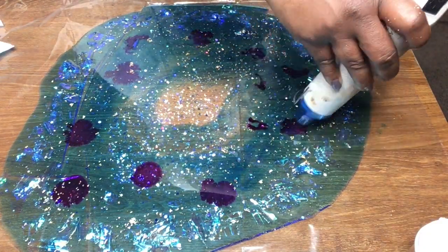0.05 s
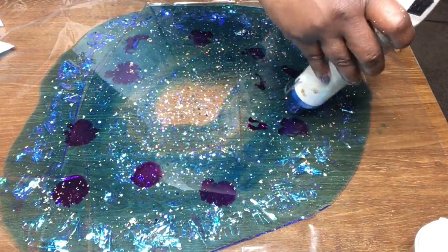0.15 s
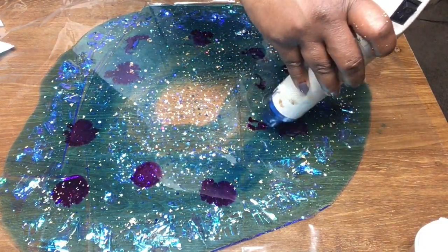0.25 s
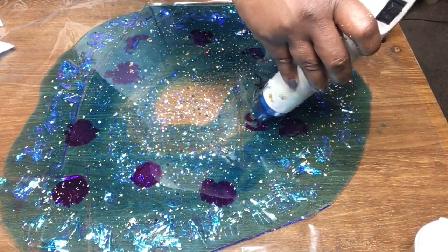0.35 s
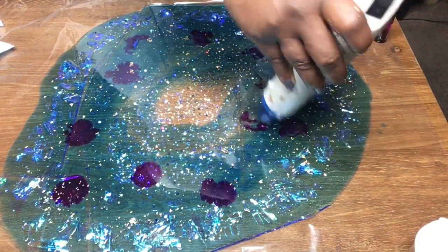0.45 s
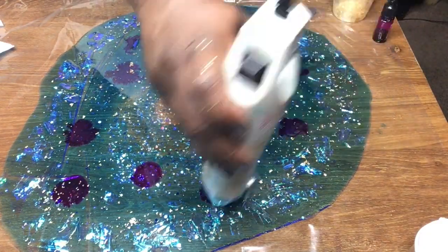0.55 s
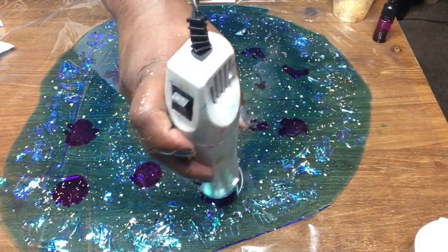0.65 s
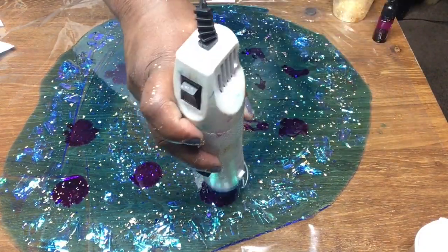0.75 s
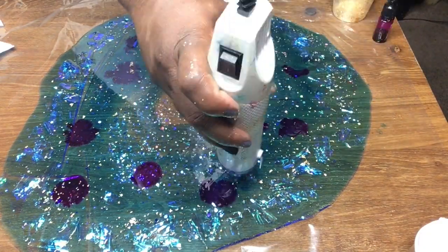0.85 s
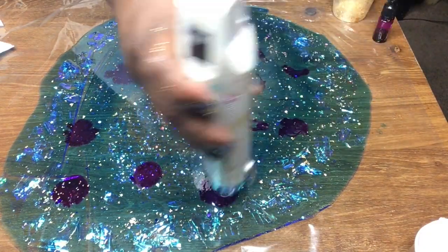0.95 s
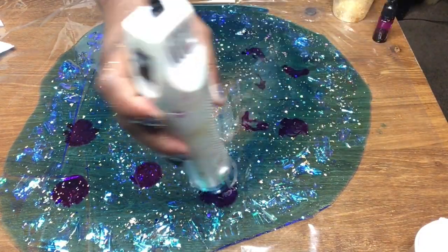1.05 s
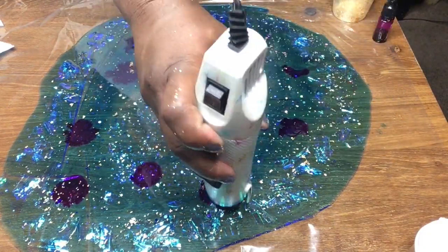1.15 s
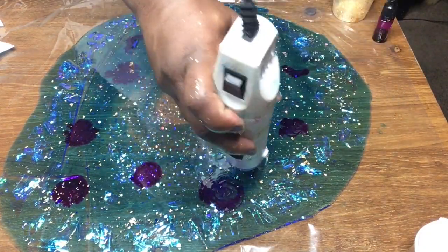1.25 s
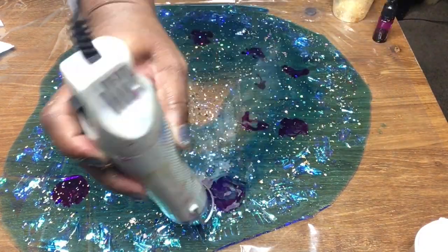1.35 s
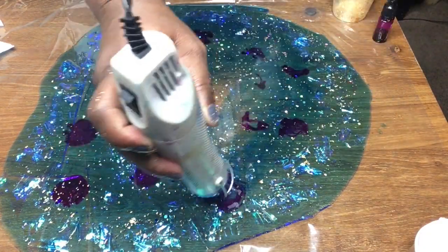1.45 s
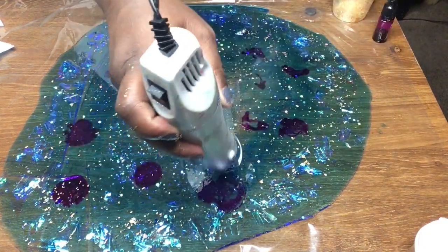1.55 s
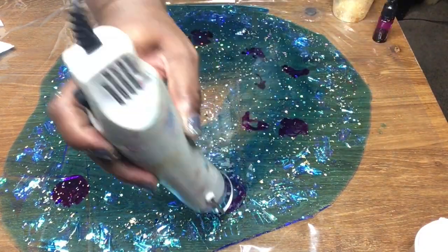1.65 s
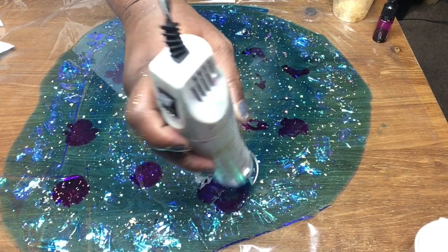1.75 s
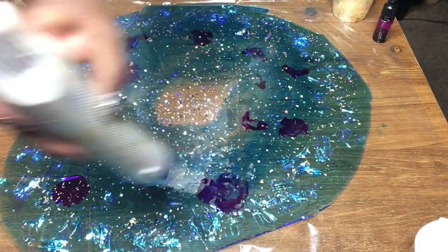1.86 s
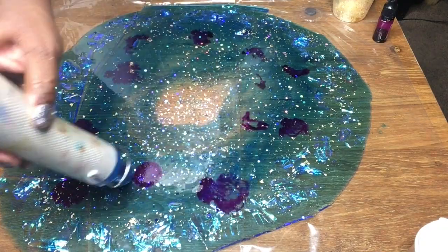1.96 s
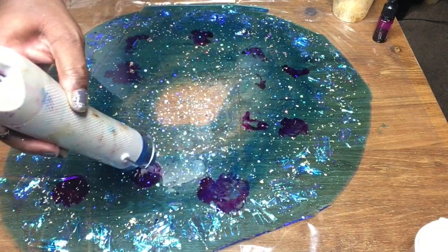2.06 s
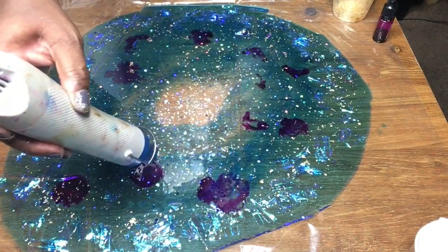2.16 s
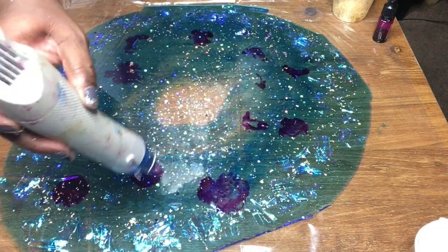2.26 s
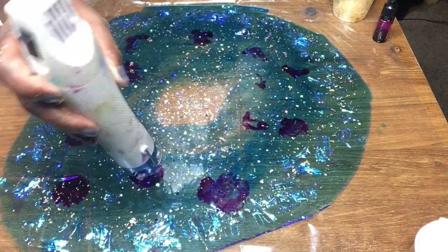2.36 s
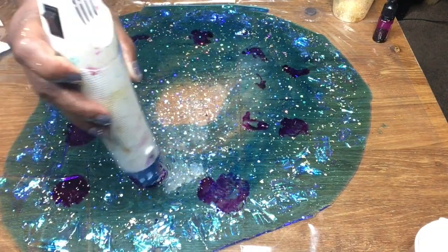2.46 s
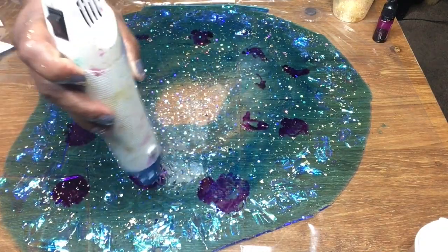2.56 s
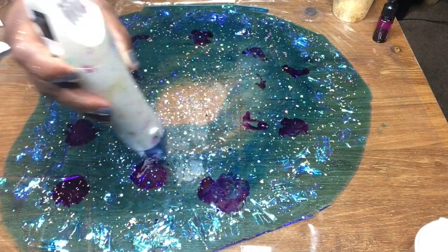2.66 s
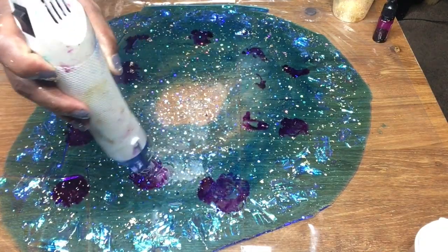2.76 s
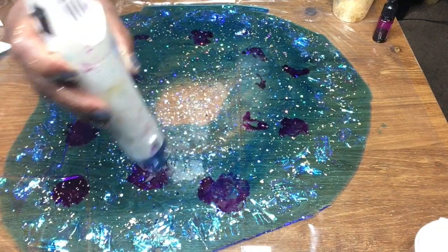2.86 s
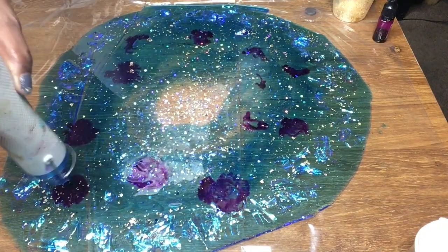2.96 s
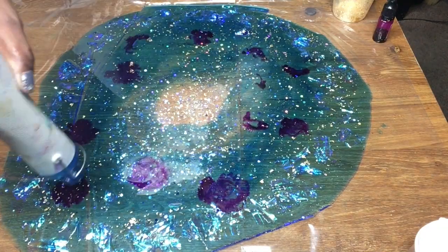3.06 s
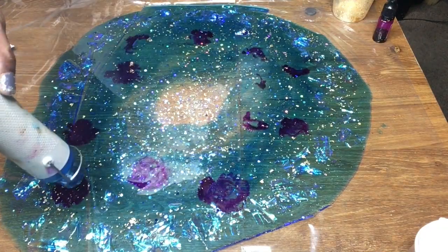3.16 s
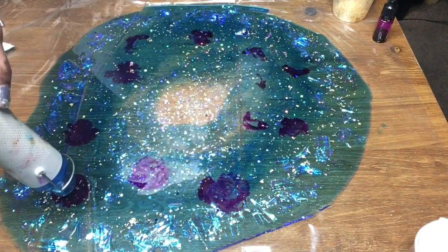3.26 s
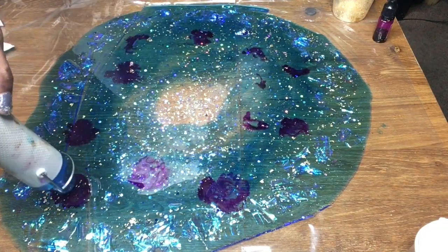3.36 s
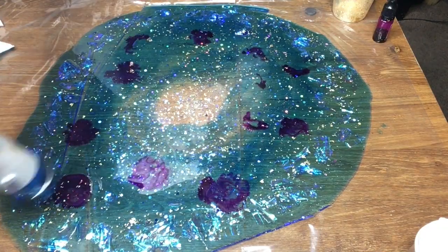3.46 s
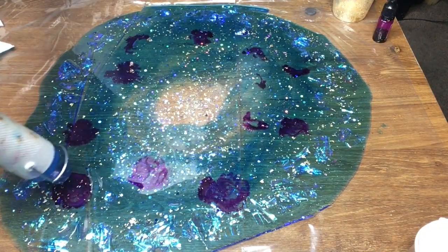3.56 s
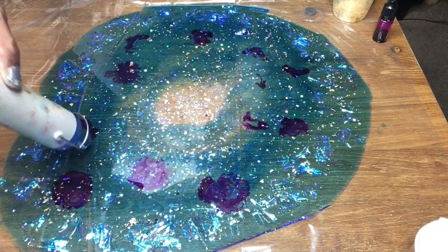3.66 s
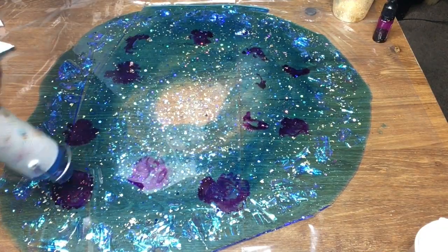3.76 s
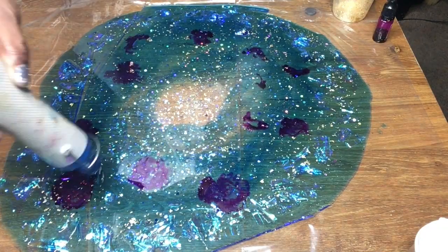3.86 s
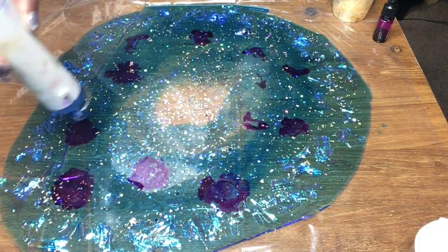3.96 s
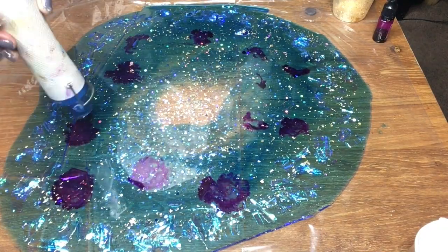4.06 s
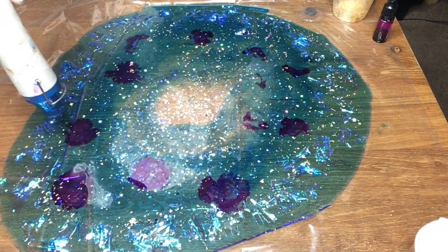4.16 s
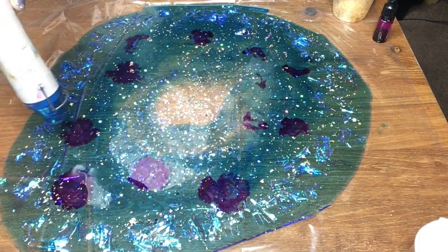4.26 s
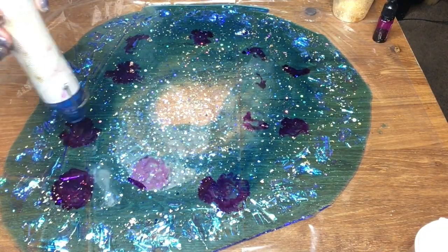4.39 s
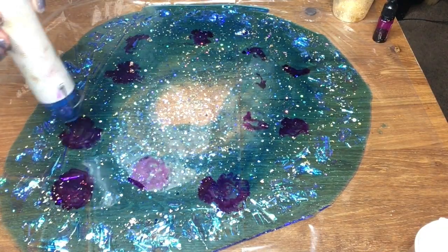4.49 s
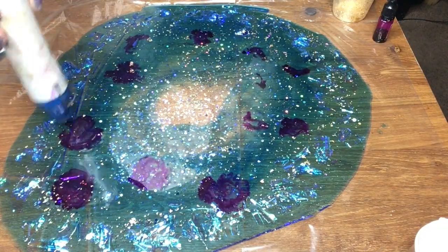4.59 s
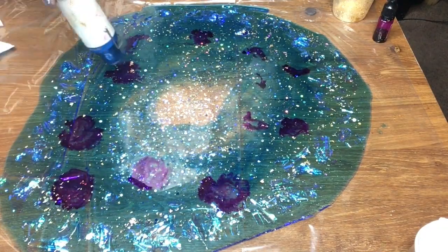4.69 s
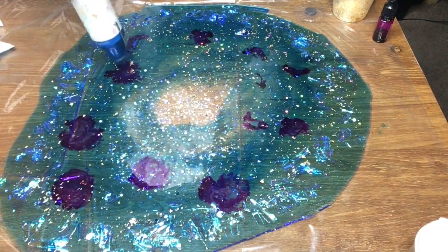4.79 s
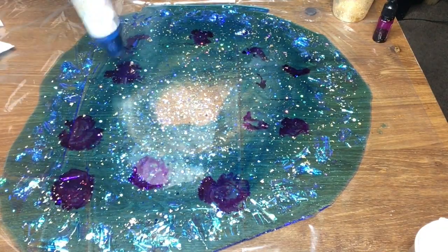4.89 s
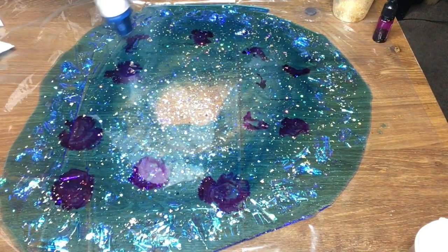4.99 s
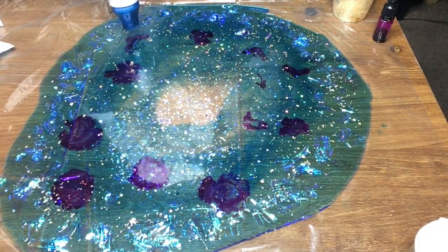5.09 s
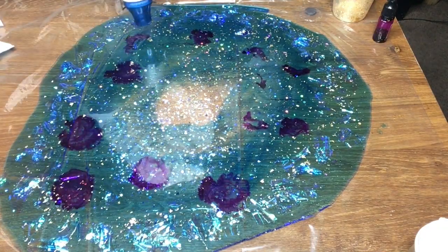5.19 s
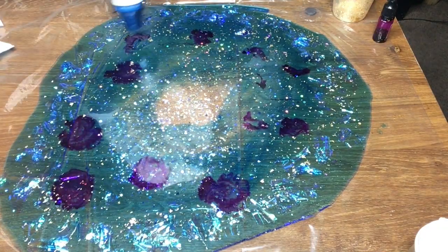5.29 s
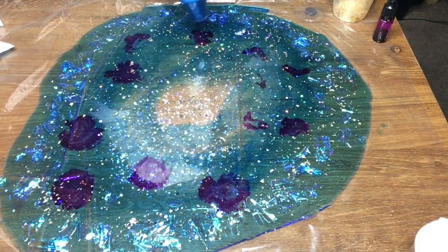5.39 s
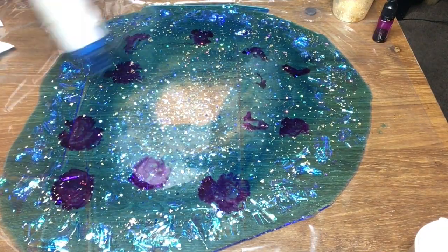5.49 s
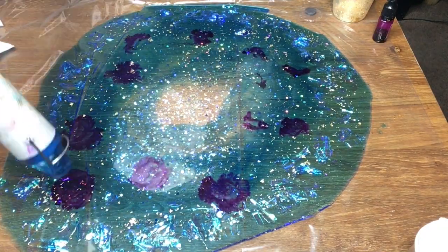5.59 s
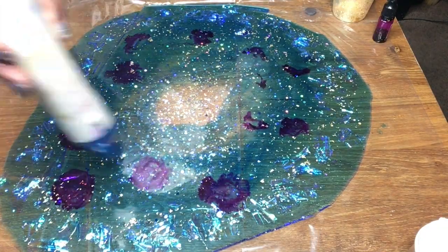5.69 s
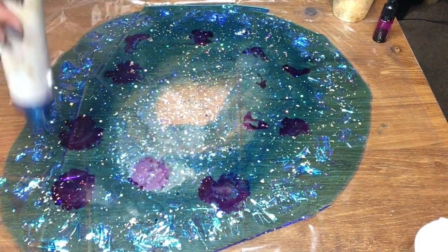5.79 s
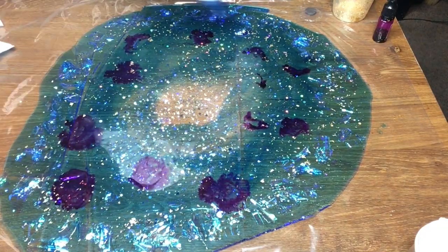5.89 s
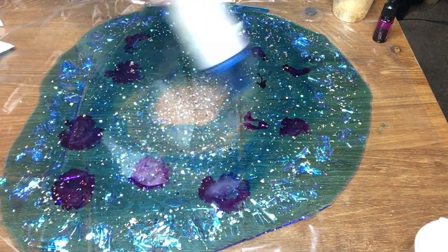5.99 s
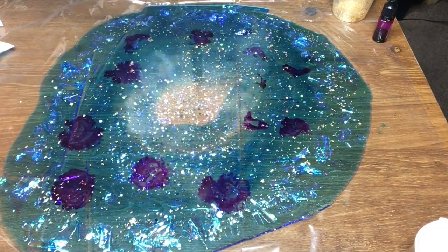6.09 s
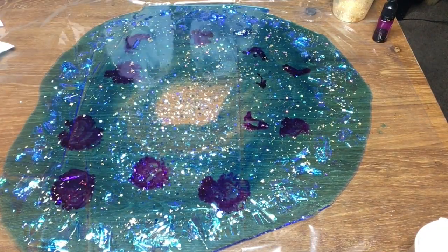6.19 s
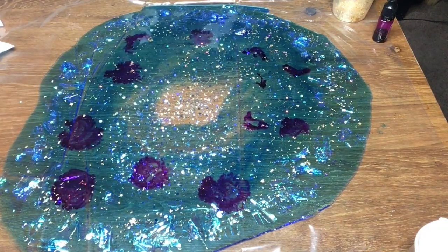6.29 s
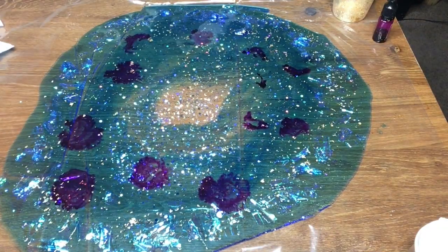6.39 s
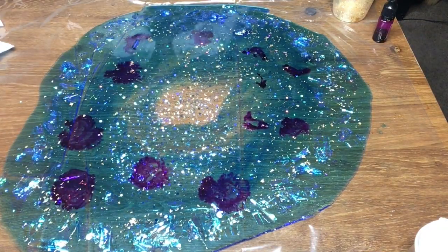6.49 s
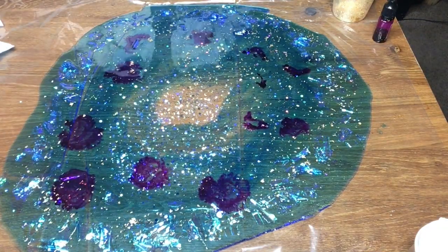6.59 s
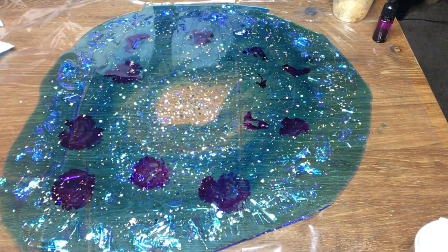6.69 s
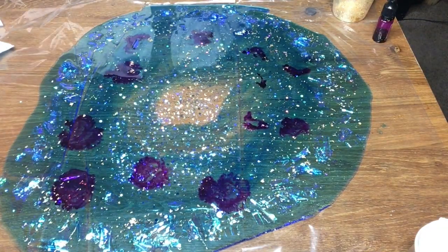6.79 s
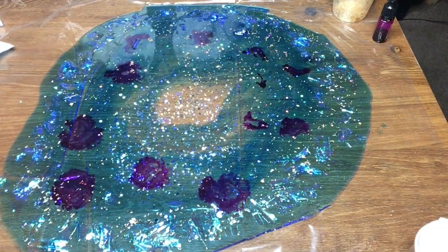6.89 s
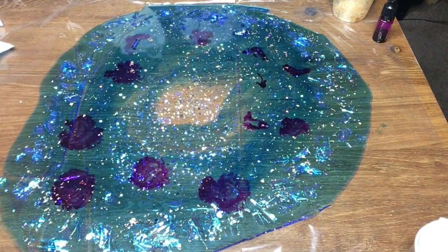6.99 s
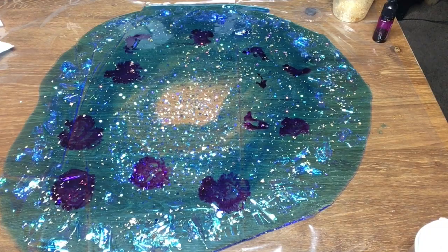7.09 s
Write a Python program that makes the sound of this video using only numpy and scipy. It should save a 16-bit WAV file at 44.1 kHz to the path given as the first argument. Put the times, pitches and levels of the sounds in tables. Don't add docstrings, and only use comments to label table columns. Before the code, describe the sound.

In a quiet craft room, a handheld hot-air tool whines and blows steadily, heard very near on a phone microphone with thin bass. Air noise swells and thins, with a short fluttering treble reflection from the table. A click cuts the motor, which drops in pitch and stops within a tenth of a second. Small taps, two hollow plastic knocks and a brief scrape follow over soft room hush and a distant pulsing hum.

```python
import sys
import numpy as np
from scipy import signal
from scipy.fft import rfft, irfft, next_fast_len
from scipy.io import wavfile
from scipy.ndimage import uniform_filter1d, map_coordinates

SR = 44100
rng = np.random.default_rng(int(sys.argv[2]) if len(sys.argv) > 2 else 0)


def makeup_ratio(level_db):
    decades = np.asarray(level_db, float) / 20
    return 10 ** decades


def inscribe(sig):
    pcm = np.round(np.clip(np.atleast_2d(sig).T, -1, 1) * 32767)
    wavfile.write(sys.argv[1], SR, pcm.astype(np.int16))


N = 314861

# (frequency [Hz], density [dB per Hz])
ROOM_SPECTRUM = [(60, -32), (120, -19), (200, -22.5), (300, -11.5), (500, -8.5), (750, -10.5), (1000, -5),
                 (1300, -10), (1700, -19.5), (3300, -24.5), (6000, -30), (11000, -32), (15000, -35),
                 (15500, -45)]
# (time [s], level [dB])
HUSH_GAIN = [(6.5, 1), (6.7, 0), (6.85, -2.5), (6.98, -2), (7.02, -1)]
# (frequency [Hz], width [Hz], level [dB])
APPLIANCE_HUM = [(384, 10, -83), (468.3, 4, -83), (1270, 14, -78), (3004, 20, -90)]
# (time [s], frequency [Hz])
THROB_PITCH = [(0, 1150), (5.1, 1147), (5.4, 1141), (6.9, 1137), (7.0, 1145)]
# (middle [s], length [s], level [dB])
THROB_SWELLS = [(6.495, 0.07, -66), (6.628, .1, -64.5), (6.718, .07, -64), (6.862, 0.13, -65),
                (7.055, 0.19, -64.5)]
# (time [s], centre [Hz])
SIDE_BANDS = [(.1, 13200), (.89, 5800), (1.35, 5800), (1.49, 11200), (1.82, 6700), (1.84, 7700),
              (1.84, 12500), (1.91, 6300), (2.03, 9800), (2.05, 5800), (2.05, 14900), (2.12, 11800),
              (2.3, 11200), (2.33, 4800), (3.07, 11800), (3.14, 4800), (3.51, 5300), (3.51, 11200),
              (3.79, 13200), (5.07, 11200), (5.07, 13200), (5.67, 14600), (6.13, 11200)]

# (time [s], crack [dB], hollow knock [dB], shell [dB], shell pitch [Hz])
TAPS = [(6.411, -32, -75, -51, 1510), (6.5255, -44, -66, -60, 5800), (6.5516, -63, -70, -73, 1520),
        (6.6375, -58, -68, -63, 1610), (6.6546, -56, -71, -64, 1510), (6.674, -60, -68, -55, 2000),
        (6.678, -61, -70, -59, 1500), (6.6954, -66, -68, -62, 1580), (6.7332, -47, -41, -45, 1580),
        (6.7654, -59, -71, -71, 1520), (6.774, -58, -76, -69, 2750), (6.7893, -59, -70, -63, 2800),
        (6.801, -42, -46.5, -56, 2700), (6.8284, -57, -66, -69, 2560), (6.899, -78, -66, -76, 1540),
        (6.997, -56, -70, -64, 1500)]
# (time [s], frequency [Hz], level [dB])
THUDS = [(6.285, 674, -48), (6.287, 1230, -44), (6.322, 670, -46), (6.324, 990, -49), (6.49, 230, -58),
         (6.488, 310, -58), (6.492, 185, -56), (6.338, 910, -53), (6.83, 160, -58)]
# (time [s], frequency [Hz], level [dB], t60 [s])
TICKS = [(6.5255, 5930, -46, .009), (6.5258, 9500, -50, .005), (6.5515, 6000, -61, .005),
         (6.552, 11500, -64, .004), (6.565, 1250, -57, .008), (6.6745, 2100, -43, .004),
         (6.695, 2100, -49, .003), (6.601, 11000, -72, .08), (6.9975, 3900, -63, .012),
         (6.700, 1500, -57, .006), (6.7337, 1900, -49, .004), (6.7337, 9000, -56, .004),
         (6.774, 11500, -57, .003), (6.788, 9000, -63, .003), (6.8016, 10500, -42, .005),
         (6.8015, 2390, -44, .008), (6.804, 9000, -52, .008), (6.862, 1500, -58, .002),
         (6.9003, 1100, -48, .004), (6.906, 1300, -56, .006), (6.968, 1000, -57, .004),
         (6.998, 8500, -57, .005), (7.004, 1400, -55, .005), (7.038, 11000, -69, .006),
         (7.065, 12000, -68, .008)]
# (frequency [Hz], level [dB], t60 [s])
CLACKS = [
    ([6.734, 6.7375], -43.5, [(1500, -4, .02), (1850, -1, .03), (2250, -6, .015), (3000, -6, .012), (4750, -6, .012), (5300, -8, .015), (5800, -14, .03)]),
    ([6.8012, 6.8045], -46.5, [(2050, -5, .014), (2300, -3, .02), (2530, -1, .03), (2800, -4, .035), (2990, -5, 0.042), (3230, -3, .045), (3400, -9, .03)]),
]
# (frequency [Hz], level [dB], t60 [s])
HOLLOW_MODES = [(644, -1, 0.078), (860, -6, 0.031), (1244, -17, 0.037)]
# (middle [s], length [s], level [dB])
RUSTLES = [(6.65, .05, -73), (6.76, .08, -68), (6.818, 0.065, -63.5), (7.012, .03, -75), (7.05, .12, -79)]
# (frequency [Hz], density [dB per Hz])
RUSTLE_SPECTRUM = [(1500, -20), (2600, 2), (3500, -4), (6000, -6), (11000, -7), (15700, -10)]

# (frequency [Hz], density [dB per Hz])
ROAR_SPECTRUM = [(150, -37), (300, -32), (760, -21.5), (850, -10), (1050, -15.5), (1500, -8), (2050, -6),
                 (2600, -4.5), (3100, -5.5), (3600, -8), (3900, -19), (4800, -41)]
HISS_SPECTRUM = [(3500, -47), (4600, -17), (4950, -8), (5200, 0), (5800, -1.5), (7200, -9), (8400, -4.5),
                 (9400, -9), (11000, -9), (13000, -10), (14500, -9.5), (15800, -10)]
INTAKE_SPECTRUM = [(3000, -27), (3600, -0.5), (4200, 0.5), (4900, -2.5), (5500, -34)]
# (time [s], centre [Hz], level [dB])
BARREL_DRIFT = [(0.0, 2550, 1), (0.49, 2530, 0), (0.8, 2417, -3), (1.85, 2424, -1), (2.21, 2596, 0.5),
                (2.71, 2600, 1.5), (3.3, 2543, 2), (3.9, 2607, 0.5), (4.5, 2680, 1), (4.69, 2640, -2),
                (4.83, 2455, -0.5), (5.43, 2424, 3.5), (5.87, 2665, 1.5), (5.98, 2356, -3), (6.03, 2626, 2),
                (6.3, 2500, -0.5), (6.45, 2470, 4), (6.52, 2450, 4), (6.56, 2450, -9)]
# (offset from centre [Hz], density [dB per Hz])
BARREL_SHAPE = [(5, -3), (120, -1.5), (260, -6.5), (500, -29)]
# (time [s], level [dB], top treble [dB])
NOZZLE_AIM = [(0, -1, 2.5), (.5, 0.5, -1.5), (.62, 1, 2.5), (1.35, 1.5, 1.5), (1.45, 1.5, 0),
              (1.92, 0.5, -0.5), (2.0, 1, -0.5), (3.3, 0, -3), (3.7, 0.5, -4), (4.6, -0.5, -2),
              (5.15, -6, 5.5), (5.5, -6, 3.5), (5.95, -2, 1.5), (6.3, -5.5, 1), (6.41, -4, -2)]
# (time [s], level [dB])
TOP_HISS = [(0, 1.5), (2, 1), (3.1, 2), (3.5, 3), (4.0, 2), (4.2, -5), (5.0, -5), (5.3, -4), (5.8, -3),
            (6.4, 0)]
# (middle [s], length [s], level [dB])
PASSES = [(5.632, 0.22, 3), (5.768, 0.27, 2.5), (5.93, .12, -1.5), (3.9, 0.34, 0.5), (6.102, 0.26, 1.5)]
# (time [s], spacing of comb peaks [Hz], echo share [0-1])
TABLE_ECHO = [(0, 4150, .25), (.15, 4250, .35), (.55, 4250, .35), (.66, 3600, .42), (1.95, 3600, .4),
              (2.05, 3750, .12), (3.15, 3880, .22), (3.55, 4400, .25), (4.0, 4500, .25), (4.3, 4800, .45),
              (4.7, 5000, .45), (4.97, 5300, .5), (5.11, 6350, .55), (5.33, 6450, .45), (5.46, 5600, .32),
              (5.62, 4300, .2), (6.05, 4200, .2), (6.25, 3700, .15), (6.5, 3700, .15)]
# (delay [ms], level [dB])
WALL_ECHOES = [(1.7, -26), (2.3, -19), (2.9, -20), (3.6, -23.5), (4.1, -18), (4.8, -22.5), (6.6, -26),
               (9.3, -26), (13.1, -23.5), (17.9, -26.5), (24.3, -23)]

# (time [s], blade rate [Hz])
FAN_DRIFT = [(0, 1690.5), (.58, 1695), (1.27, 1691), (1.5, 1686), (2.3, 1694), (3.07, 1685), (3.61, 1694),
             (3.74, 1690), (4.45, 1690), (4.62, 1684.5), (4.81, 1694), (4.98, 1690), (5.5, 1693),
             (5.78, 1684), (6.07, 1689.5), (6.24, 1684), (6.41, 1697)]
# (from [s], until [s], slowing [s])
FAN_SURGES = [
    (-1, 1.27, .15),
    (3.61, 4.22, .26),
    (4.81, 5.2, .17),
]
# (time [s], share of full speed [0-1], tone gain [dB])
BRAKING = [(6.418, 1, -2), (6.428, .91, 1), (6.443, .79, -7), (6.449, .73, -18), (6.48, .45, -20),
           (6.5, .15, -24), (6.51, .05, -70)]
# (from [s], blade tone [dB], 3rd overtone [dB], 5th [dB], upper overtones [dB])
HAND_POSES = [(0, -42, -51.5, -50.5, -54.5), (.66, -57.5, -57.5, -48.5, -52), (.86, -52, -58, -50, -52.5),
              (1.13, -52.5, -59, -49, -52), (1.385, -51.5, -59, -43.5, -60), (1.69, -45.5, -57, -43.5, -57),
              (1.78, -49.5, -57, -44.5, -55), (1.9, -46, -63, -44.5, -68), (2.39, -53.5, -59.5, -43.5, -63),
              (3.2, -48.5, -59, -43, -78), (3.675, -42, -56, -42, -75), (4.03, -44, -46.5, -46.5, -70),
              (4.17, -43.5, -46.5, -58, -65), (4.35, -51.5, -48.5, -59, -62), (4.52, -59, -52, -50, -62),
              (4.72, -48, -63, -50.5, -58), (5.0, -42.5, -65, -54.5, -60), (5.56, -50, -54.5, -53, -61),
              (5.75, -55, -59, -44, -66), (5.88, -43, -56, -42.5, -58), (5.97, -43.5, -48, -50.5, -55),
              (6.08, -51, -56, -39.5, -68), (6.17, -45, -61, -50.5, -55.5), (6.32, -47.5, -58.5, -54, -63)]
# (time [s], depth [dB])
FLUTTER = [(0, .7), (5.4, .8), (5.6, 3.5), (6.4, 3.5)]
# (multiple of blade rate, middle [s], length [s], level
# [dB])
PARTIAL_SWELLS = [(1, .96, .2, 2.5), (1, 1.3, 0.055, -6), (1, 1.09, 0.081, 6), (2, 0.614, .15, 9.5),
                  (2, 1.07, 0.16, 9), (2, 2.23, 0.86, 4.5), (2, 3.85, 2.7, 5.5), (2, 5.06, 0.76, 7),
                  (2, 5.72, 0.41, 7.5), (2, 7.1, .22, 12.5), (3, 1.11, .15, 7), (3, 2.48, .2, 9),
                  (3, 5.62, 0.12, 6), (4, 0.73, 1.9, 5.5), (4, 2.3, 1.8, 8), (4, 4.13, 0.49, 8),
                  (3, 6.16, 0.092, 8.5), (4, 5.68, 0.24, 8), (5, 0.94, 0.2, -7), (5, 2.7, 0.066, -1),
                  (5, 4.78, 0.16, 2), (5, 4.6, 0.17, -6), (5, 6.27, 0.081, 8), (1, 4.62, 0.18, -3),
                  (5, 5.81, .04, -6), (6, 2.8, 0.54, 5.5), (7, 0.27, 0.64, -3), (8, .95, 1.0, -7), (8, 2.5, .6, 3),
                  (3, 4.96, 0.32, 9), (2, 6.1, 0.25, 7.5), (3, 3.69, 0.55, 5), (4, 0.66, .2, 4), (4, 1.3, .4, 3),
                  (4, 3.58, .9, 5.5), (4, 4.55, .3, 6), (4, 5.9, .4, 6), (4, 6.24, 0.1, 14), (5, 4.36, .3, 6.5),
                  (5, 5.7, 0.19, 5), (6, 1.77, 0.4, 3), (7, 4.92, .16, 5), (7, 1.38, .14, 6), (7, 2.3, .5, 1),
                  (7, 4.03, 0.13, 11), (8, 2.05, .5, 7), (8, 4.5, .6, 6), (8, 5.1, .3, 6), (8, 6.35, .14, 7),
                  (1, 4.69, .14, 3),
                  (1, 0.77, .16, -7), (1, 1.16, .07, -7), (1, 1.62, .1, -4), (1, 4.4, 0.22, 1.5), (2, 1.65, .6, -2),
          (2, 5.91, .1, -9), (2, 6.33, .14, -8), (2, 3.05, .6, -1), (3, 0.88, .3, -3), (3, 0.32, .5, -1),
          (1, 6.3, .1, 0), (1, 5.12, .3, -1.5), (3, 1.04, .07, -8), (3, 1.3, .4, -4), (3, 2.82, .45, -8),
          (3, 5.15, .14, -6), (4, 2.77, .25, -9), (4, 2.3, 0.15, -8), (4, 1.6, .2, -8), (4, 4.68, 0.14, -5),
          (5, 4.84, .1, -8), (8, 4.8, .14, -9), (5, 4, 0.029, -3), (6, 2.15, 0.59, -9), (6, 3.7, 0.87, -13),
          (9, 5.1, .7, -8), (6, 5.22, .5, -10), (7, .1, .4, -5), (7, 2.9, .9, -5), (7, 4.45, .25, -6),
          (7, 3.9, .2, -10), (8, 5.95, 0.398, -3), (8, 1.75, .15, -4), (1, .68, .05, -4),
          (1, 0.89, .04, -5), (5, 5.48, .14, -12), (1, 1.85, .08, -5), (3, .08, .2, -0.5),
          (3, 4.07, 0.11, -4), (3, 5.8, .12, -6), (3, 6.11, .03, -8), (3, 6.28, .14, -3), (5, 5.6, .05, -8),
          (5, 6.0, .12, -1), (5, 6.065, .03, -12), (5, 6.235, .03, -11), (5, 6.36, .06, -10),
          (5, 5.86, 0.038, -5), (4, 6.0, .04, -8), (4, 5.92, .05, -8)]
# (multiple of blade rate, level [dB])
EVEN_OVERTONES = [(2, -61.5), (4, -62)]
# (multiple of blade rate, level above the pose's upper curve [dB])
UPPER_OVERTONES = [(6, 0), (7, -1.5), (8, -2.5), (9, -5.5)]
# (multiple of shaft speed, level [dB])
SHAFT_ORDERS = [(2, -85), (10, -68)]
# (multiple of shaft speed, level [dB])
UNEVEN_LINES = [(19, -73), (30, -73), (33, -70), (38.5, -73), (40, -72), (45.5, -75), (47, -75), (51, -73),
                (52.5, -71), (54, -72), (58, -72), (59.5, -70), (61, -75)]

BLADES = 7
OFF_S = 6.415
TURN_S = 0.09
ROAR_FADE, HISS_FADE = 150, 255
FIFTH_FADE, OVERTONE_FADE = 130, 500


def unit(x):
    return x / np.sqrt(np.mean(x ** 2) + 1e-20)


def curves(rows):
    s, *cols = np.transpose(rows)
    return [np.interp(np.arange(N) / SR, s, c) for c in cols]


def wobble(rate):
    s = np.arange(0, N + 64, 64) / SR
    knots = rng.standard_normal(int(N * rate / SR) + 4)
    return np.interp(np.arange(N) / SR, s, map_coordinates(knots, [s * rate]))


def bump(middle, length):
    return np.cos(np.pi * np.clip((np.arange(N) / SR - middle) / length, -.5, .5)) ** 2


def swells(rows):
    return sum(makeup_ratio(db) * bump(s, length) for s, length, db in rows)


def since_off():
    return np.clip(np.arange(N) / SR - OFF_S, 0, None)


def above(x, hz, order=2):
    return signal.sosfiltfilt(signal.butter(order, hz, "high", fs=SR, output="sos"), x)


def noise(spectrum, patchy_db):
    size = next_fast_len(N)
    z = signal.stft(rng.standard_normal(size), nperseg=512)[2]
    field = uniform_filter1d(rng.standard_normal(z.shape), 5, 0)
    field = unit(uniform_filter1d(field, 12, 1))
    x = rfft(signal.istft(z * makeup_ratio(patchy_db * field), nperseg=512)[1][:size])
    f, db = np.transpose(spectrum)
    log_hz = np.log(np.fft.rfftfreq(size, 1 / SR) + 1)
    return unit(irfft(x * makeup_ratio(np.interp(log_hz, np.log(f), db, -120, -120)), size)[:N])


def tone(hz, width_hz):
    return np.sqrt(2) * np.sin(2 * np.pi * np.cumsum(hz + width_hz * wobble(30)) / SR)


def room():
    hush = noise(ROOM_SPECTRUM, patchy_db=2.0)
    hush += (makeup_ratio(curves(HUSH_GAIN)[0]) - 1) * above(hush, 1800)
    hum = sum(makeup_ratio(db + 2.5 * wobble(6)) * tone(hz, width) for hz, width, db in APPLIANCE_HUM)
    beats = makeup_ratio(-70 - ROAR_FADE * since_off()) * (1 + 0.35 * wobble(9))
    beats += makeup_ratio(-75) + swells(THROB_SWELLS)
    throb = tone(curves(THROB_PITCH)[0], width_hz=3.15)
    throb += makeup_ratio(-14) * tone(1205, width_hz=14.9)
    return makeup_ratio(-68) * hush + hum + beats * makeup_ratio(1.7 * wobble(25)) * throb


def side_bands():
    out, size = np.zeros(N), round(0.049 * SR)
    width_hz, level_db, tilt_db = 1450, -52.5, -2.5
    for s, hz in SIDE_BANDS:
        band = np.abs(np.fft.rfftfreq(size, 1 / SR) - hz) < width_hz / 2
        grain = unit(irfft(rfft(rng.standard_normal(size)) * band, size)) * np.hanning(size)
        out[round(s * SR) - size // 2:][:size] += grain * makeup_ratio(tilt_db * np.log2(hz / 5000))
    return makeup_ratio(level_db) * np.array([out, -out])


def mains():
    peak_s, period_s = .1, .93
    beat = 1 + .4 * np.cos(2 * np.pi * (np.arange(N) / SR - peak_s) / period_s)
    return beat * makeup_ratio(-83.5 + 1.5 * wobble(6) - ROAR_FADE * since_off()) * tone(236.9, width_hz=2)


def ring(t, hz, db, t60):
    return makeup_ratio(db - 60 * t / t60) * np.sin(2 * np.pi * hz * t)


def tap_sound(t, crack_db, hollow_db, shell_db, shell_hz):
    bright = signal.butter(2, (5000, 13500), "band", fs=SR, output="sos")
    crack = signal.sosfilt(bright, rng.standard_normal(len(t)))
    crack *= makeup_ratio(2 - 60 * t / 0.005) + makeup_ratio(-10.0 - 60 * t / 0.077)
    hollow = sum(ring(t, hz, db + rng.normal(0, 1.4), t60) for hz, db, t60 in HOLLOW_MODES)
    jolts = rng.standard_normal(len(t)) * (makeup_ratio(-60 * t / 0.003) + makeup_ratio(-6 - 60 * t / 0.073))
    shell = np.convolve(jolts, ring(t, shell_hz, 0, 0.0032))[:len(t)]
    shell /= np.abs(shell).max()
    return makeup_ratio(crack_db - 2.5) * crack + makeup_ratio(hollow_db + 0.5) * hollow + makeup_ratio(shell_db + 1.5) * shell


def handling():
    out, t = np.zeros(N + SR), np.arange(SR // 8) / SR
    rise = 1 - np.exp(-t / 0.00053)

    def add(s, sound):
        out[round(s * SR):][:len(t)] += sound

    for s, *levels in TAPS:
        add(s, rise * tap_sound(t, *levels))
    for s, hz, db in THUDS:
        add(s, (1 - np.exp(-t * hz)) * ring(t, hz, db, 0.045))
    for s, hz, db, t60 in TICKS:
        add(s, ring(t, hz, db, t60))
    for contacts, db, modes in CLACKS:
        for k, s in enumerate(contacts):
            add(s, makeup_ratio(db - 4 * k) * rise * sum(ring(t, *mode) for mode in modes))
    slide = swells(RUSTLES) * makeup_ratio(2.5 * wobble(300)) * noise(RUSTLE_SPECTRUM, patchy_db=2.2)
    return out[:N] + slide


def walls(x):
    out = x.copy()
    for ms, db in WALL_ECHOES:
        late = np.arange(N) - (ms + 0.056 * wobble(1.304)) * SR / 1000
        out += makeup_ratio(db) * np.interp(late, np.arange(N), x, left=0)
    return out


def barrel():
    centre_hz, level_db = curves(BARREL_DRIFT)
    turn = 2 * np.pi * np.cumsum(centre_hz) / SR
    narrow = noise(BARREL_SHAPE, patchy_db=1.0) * np.cos(turn)
    narrow += noise(BARREL_SHAPE, patchy_db=1.0) * np.sin(turn)
    return makeup_ratio(level_db + 29 * since_off()) * narrow


def table(jet):
    spacing_hz, share = curves(TABLE_ECHO)
    late = np.arange(N) - SR / spacing_hz * (1 + 0.015 * wobble(3.63))
    return share * map_coordinates(above(jet, 6500), [late], order=3)


def air():
    near_db, aim_db = curves(NOZZLE_AIM)
    hiss = noise(HISS_SPECTRUM, patchy_db=1.0)
    hiss += (makeup_ratio(aim_db) - 1) * above(hiss, 9500)
    hiss += (makeup_ratio(curves(TOP_HISS)[0]) - 1) * above(hiss, 13500, order=4)
    pass_db = sum(db * bump(s, length) for s, length, db in PASSES)
    gust_db = 0.13 * wobble(14)
    roar_db = -50 + 0.35 * near_db + pass_db + gust_db - ROAR_FADE * since_off()
    roar_db -= 25 * np.clip(np.arange(N) / SR - 6.23, 0, None)
    hiss_db = -44 + near_db + 0.9 * pass_db + gust_db - HISS_FADE * since_off()
    intake_db = -57 + 0.13 * near_db + 1.62 * pass_db + gust_db - HISS_FADE * since_off()
    intake_db += curves([(0.6 - TURN_S, -5), (0.6 + TURN_S, 0)])[0]
    jet = makeup_ratio(roar_db) * (noise(ROAR_SPECTRUM, patchy_db=0.0) + makeup_ratio(-1.5) * barrel())
    jet += makeup_ratio(hiss_db) * hiss
    jet += makeup_ratio(intake_db) * noise(INTAKE_SPECTRUM, patchy_db=1.7)
    return jet + table(jet)


def posed():
    s, *cols = np.transpose(HAND_POSES)
    now = np.searchsorted(s, np.arange(N) / SR, "right").clip(1) - 1
    return uniform_filter1d(np.array(cols)[:, now], round(TURN_S * SR), axis=1)


def blade_rate():
    hz, surge_hz, rise_s = curves(FAN_DRIFT)[0], 32, .13
    for a, b, slow in FAN_SURGES:
        hz = hz + curves([(a, 0), (a + rise_s, surge_hz), (b, surge_hz), (b + slow, 0)])[0]
    return hz


def glint(multiple):
    return sum(db * bump(s, length) for k, s, length, db in PARTIAL_SWELLS if k == multiple)


def whine():
    first_db, third_db, fifth_db, upper_db = posed()
    speed, brake_db = curves(BRAKING)
    haste_db, = curves(FLUTTER)
    turn = 2 * np.pi * np.cumsum(blade_rate() * speed + 1.52 * wobble(60)) / SR
    over = np.zeros(N)
    fifth_db = fifth_db + (OVERTONE_FADE - FIFTH_FADE) * since_off()
    for k, db in [(3, third_db), (5, fifth_db)]:
        level_db = db + glint(k) + 1.1 * wobble(8) + .6 * haste_db * wobble(35)
        over += makeup_ratio(level_db) * np.sin(k * turn)
    upper_db = np.maximum(upper_db, -60.5)
    for k, db in UPPER_OVERTONES:
        level_db = upper_db + db + glint(k) + 1.2 * wobble(7) + (1.3 + .3 * haste_db) * wobble(22)
        over += makeup_ratio(level_db) * np.sin(k * turn)
    for k, db in EVEN_OVERTONES:
        level_db = db + glint(k) + 1.0 * wobble(6) + .3 * haste_db * wobble(30)
        over += makeup_ratio(level_db) * np.sin(k * turn)
    for k, db in UNEVEN_LINES:
        over += makeup_ratio(db + 3 * wobble(1.5) + 1.5 * wobble(15)) * np.sin(k * turn / BLADES)
    shaft = sum(makeup_ratio(db + 5.6 * wobble(10)) * np.sin(k * turn / BLADES) for k, db in SHAFT_ORDERS)
    shaft += makeup_ratio(-67 + 1.0 * wobble(5.13)) * np.sin(5 * turn / BLADES)
    blade = makeup_ratio(first_db + glint(1) + 0.3 * wobble(60) + 0.26 * wobble(15)) * np.sin(turn)
    over *= makeup_ratio(-OVERTONE_FADE * since_off()) * np.clip(8 * speed - 4, 0, 1)
    return np.sqrt(2) * (makeup_ratio(brake_db) * (blade + shaft) + over)


def scene():
    mono = room() + mains() + walls(air() + handling()) + whine()
    return np.tile(mono, (2, 1)) + side_bands()


def roll_off(x):
    return signal.sosfilt(signal.butter(12, 16530, fs=SR, output="sos"), x)


def record(dry):
    size = next_fast_len(N + SR)
    bass_cut = signal.sosfilt(signal.butter(5, 175, "high", fs=SR, output="sos"), dry)
    kept = np.fft.rfftfreq(size, 1 / SR) < 15730
    mix = irfft(rfft(bass_cut, size) * kept, size)[:, :N]
    return roll_off(mix)


dry = scene()
out = record(dry)
inscribe(out)
```